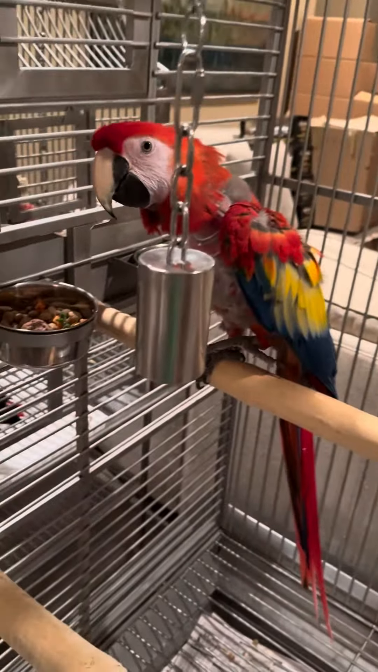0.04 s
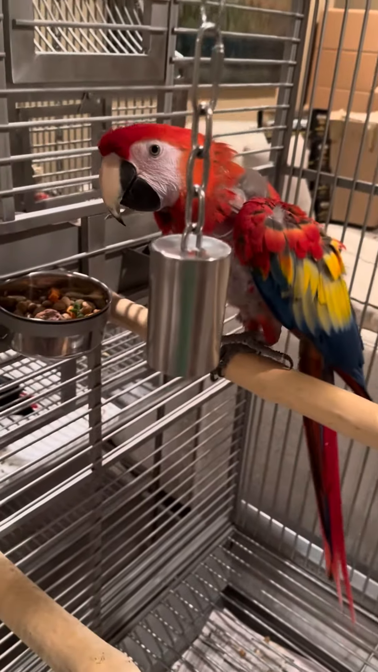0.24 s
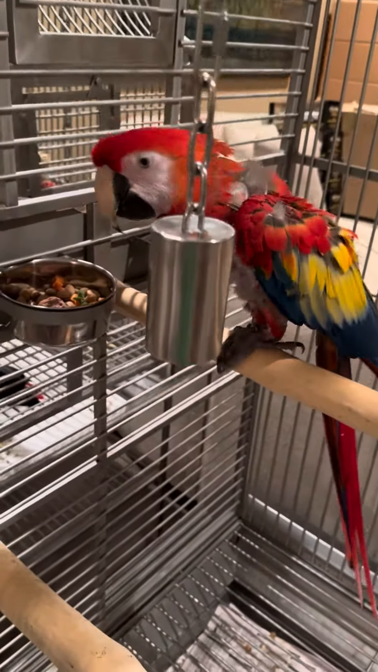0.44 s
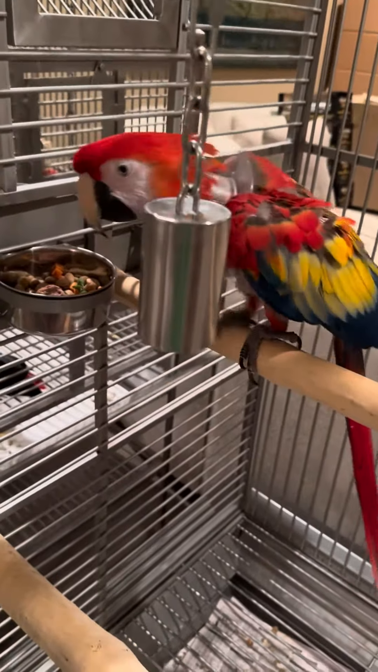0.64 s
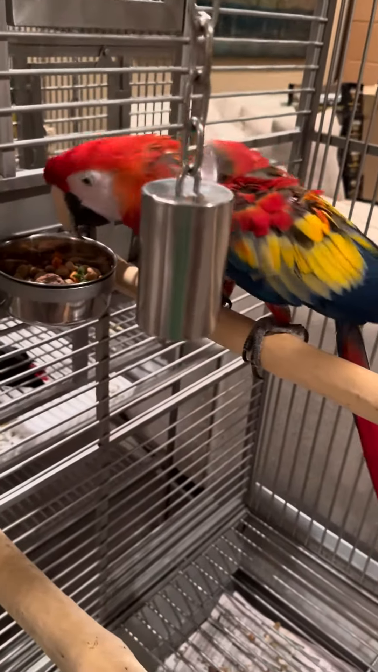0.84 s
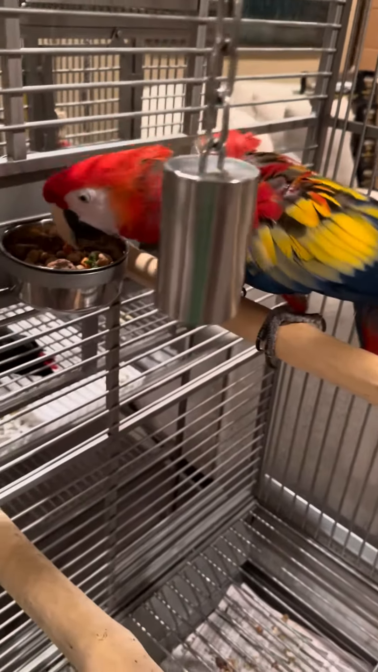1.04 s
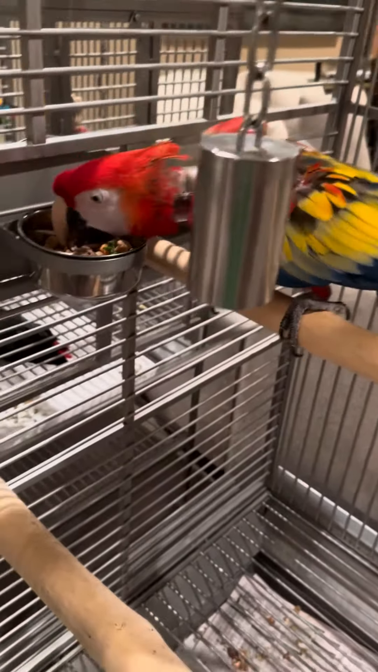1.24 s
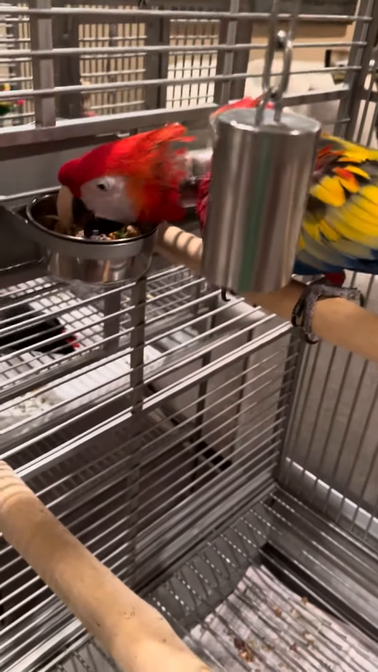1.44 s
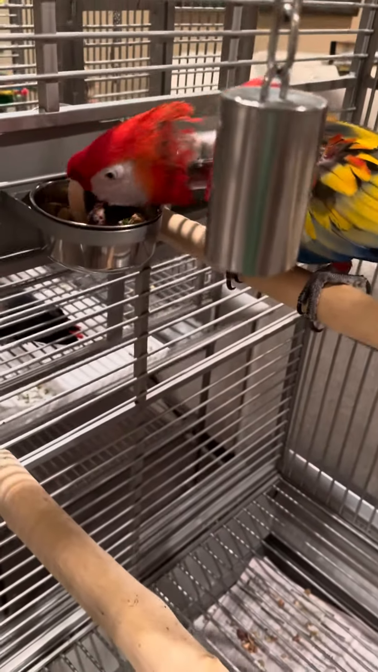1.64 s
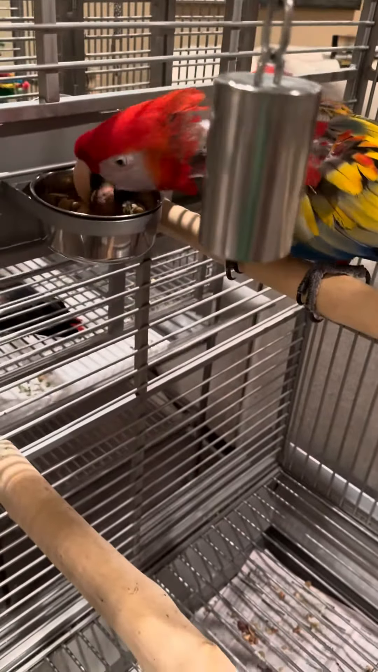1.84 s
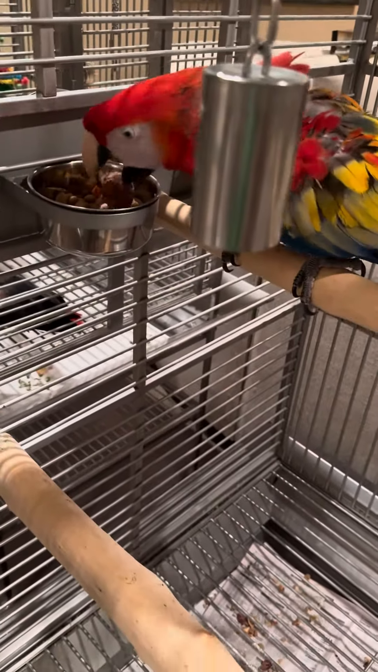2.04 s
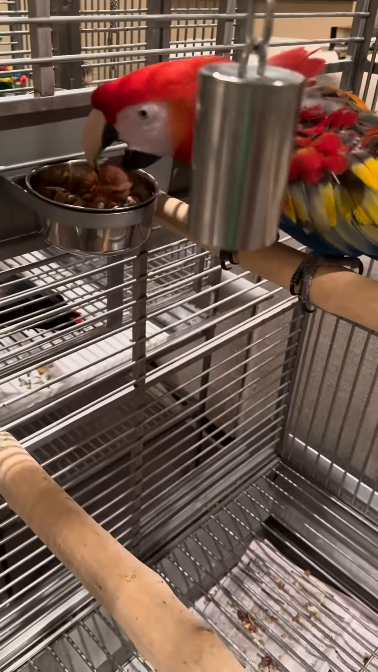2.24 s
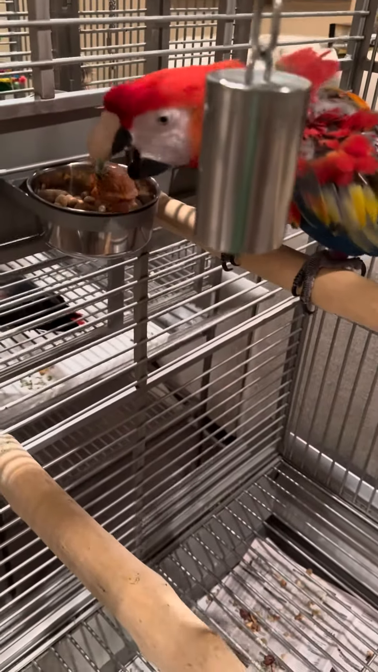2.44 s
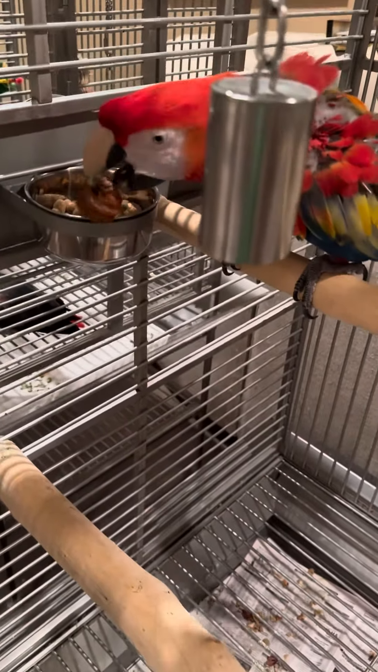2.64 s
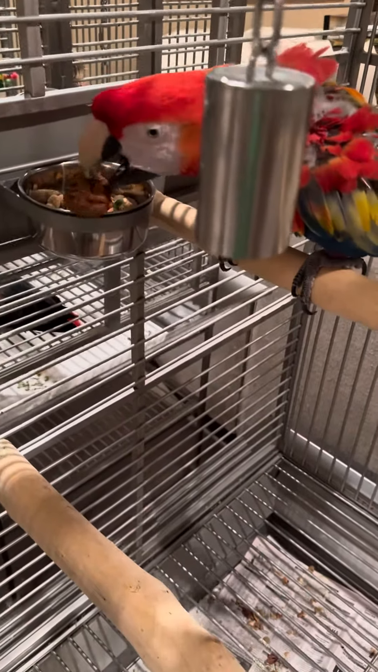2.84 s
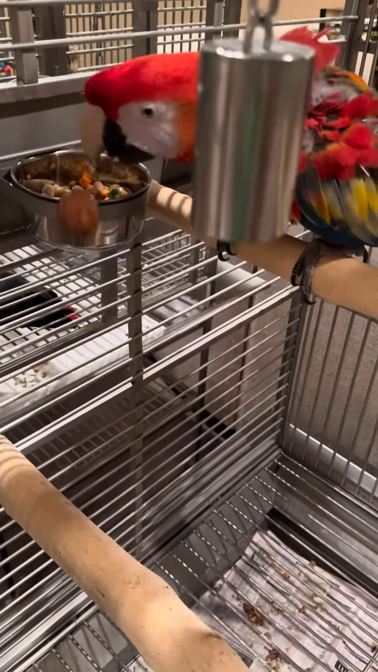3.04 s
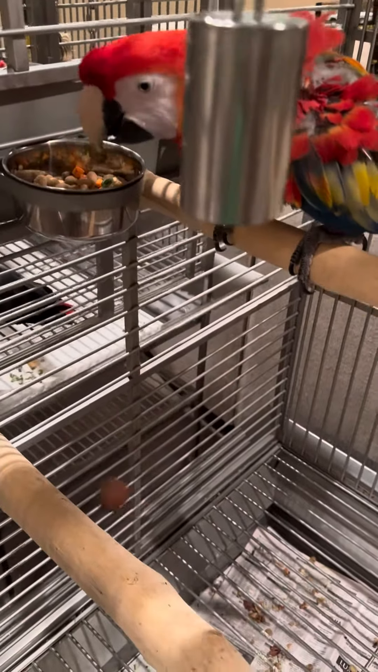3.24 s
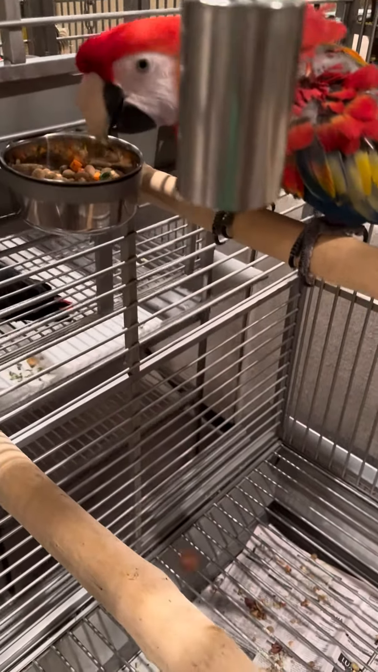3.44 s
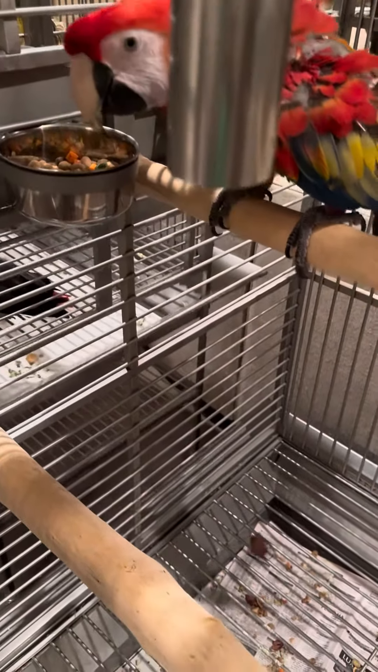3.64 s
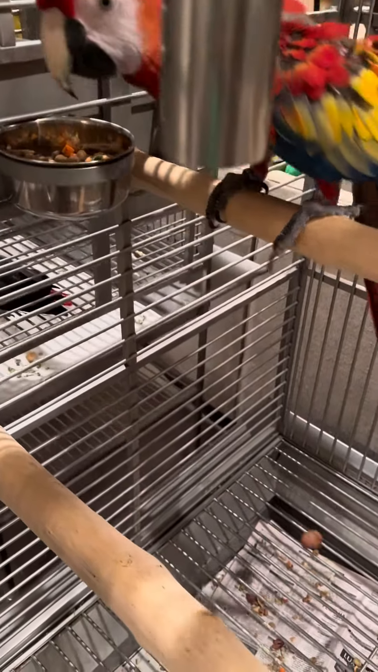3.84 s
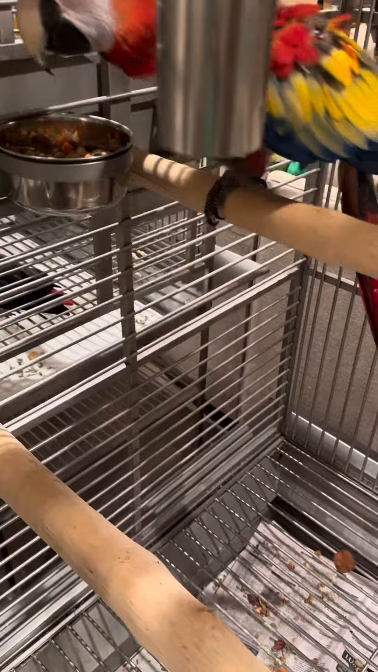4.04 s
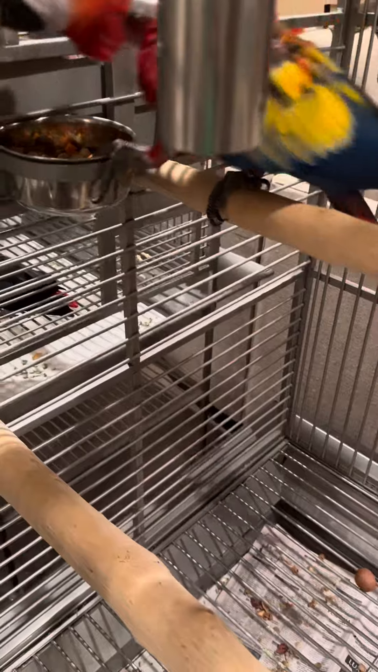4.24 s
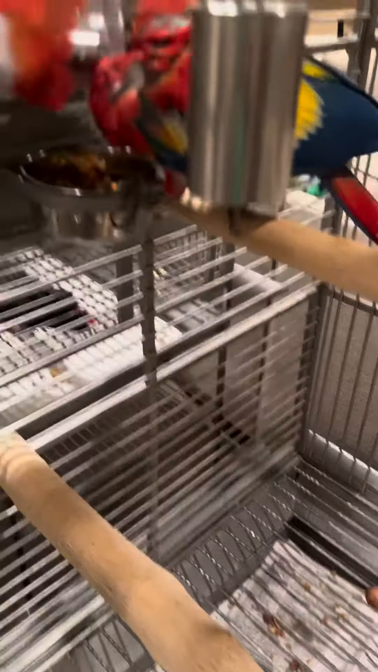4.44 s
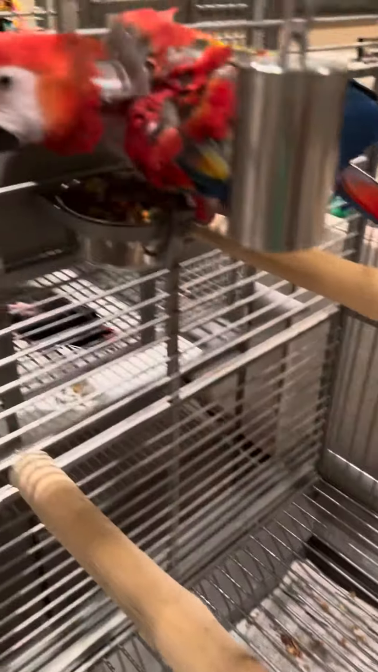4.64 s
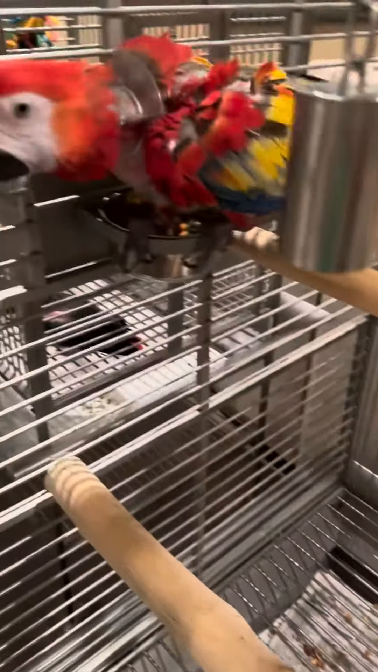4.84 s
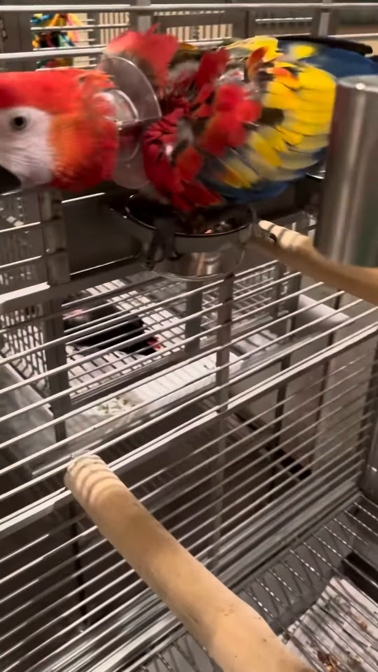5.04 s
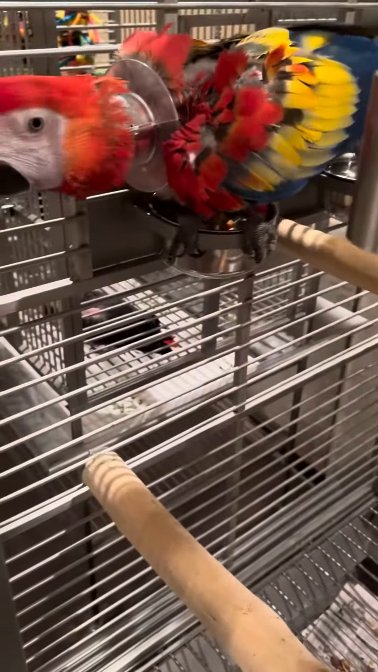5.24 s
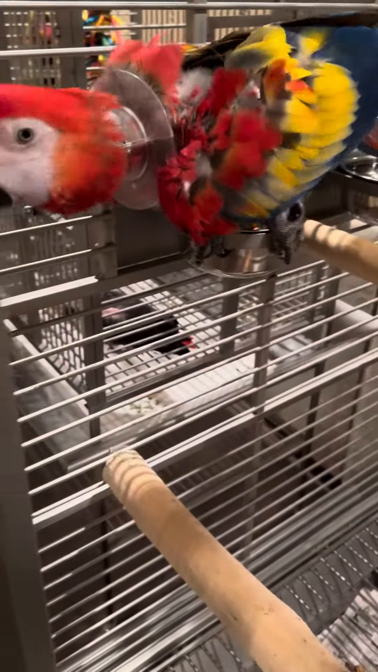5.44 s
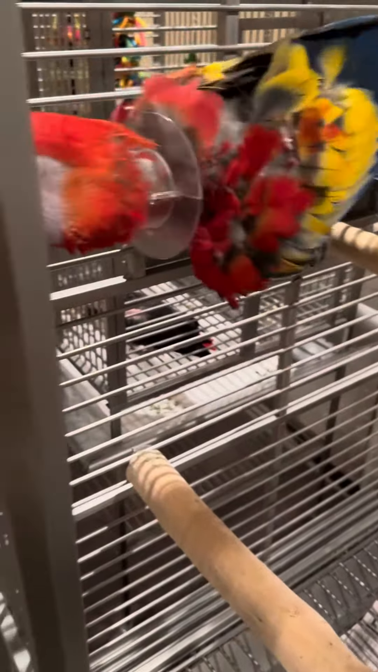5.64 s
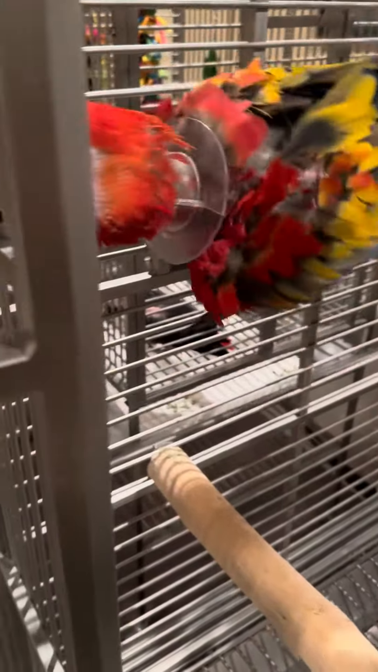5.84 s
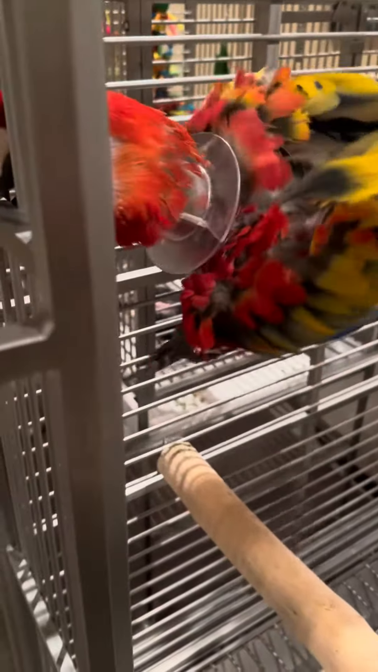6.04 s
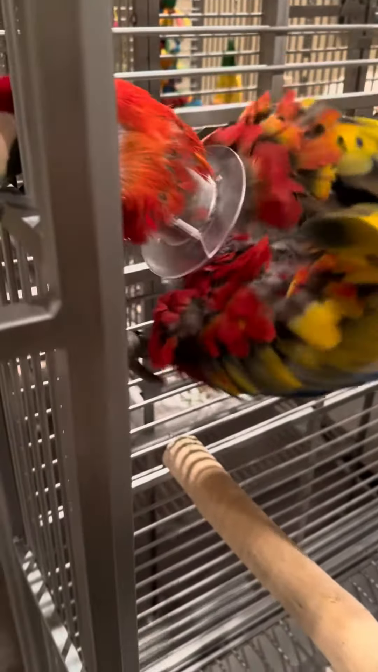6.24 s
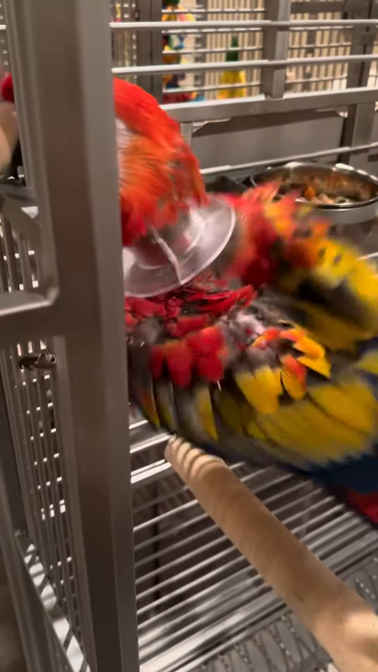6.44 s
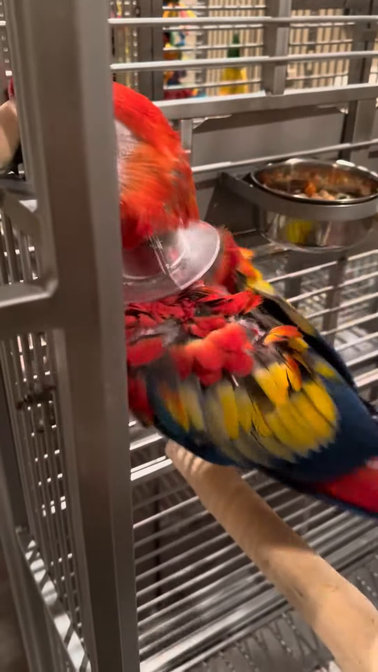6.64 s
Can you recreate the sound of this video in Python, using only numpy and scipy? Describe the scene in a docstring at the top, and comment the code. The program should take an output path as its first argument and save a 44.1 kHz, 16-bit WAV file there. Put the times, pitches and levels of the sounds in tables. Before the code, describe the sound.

A macaw shifts in a steel cage indoors, heard close in stereo. Claws click and rattle the wires, a hanging toy tings faintly, and the beak taps a food bowl. A nut then strikes the grate very loudly, bounces ringing across the metal tray, and leaves the cage humming. Beak snaps, claw rattles and a cluster of duller bowl knocks follow.

```python
"""Claws rattle steel wire panels over a low rumble, a beak snaps on bars and taps a steel bowl, a toy tings,
a nut hits the grate and bounces on the tray, the bowl knocks in its holder: a macaw in a cage indoors, heard close.
Each blow is a noise crack, a rattle that buzzes in the modes of the struck thing, and clear beating tones.
Jolts swell a room rumble, a frame drone and a wash of wires, all shaped noise over a steady floor of rumble
and wash. Two microphone ports hear the treble out of step, and scattered sound differs between them."""
import sys
import numpy as np
from scipy import signal
from scipy.fft import rfft, irfft
from scipy.io import wavfile
from scipy.ndimage import uniform_filter1d

SR = 44100
rng = np.random.default_rng(int(sys.argv[2]) if len(sys.argv) > 2 else 0)


def wav_record(signal):
    """Record a signal, one row per channel, as 16-bit PCM in the file named by sys.argv[1]."""
    frames = np.transpose(np.atleast_2d(signal))
    bounded = np.clip(frames, -1, 1)
    # unit amplitude maps onto the largest positive 16-bit level
    quanta = np.round(bounded * 32767).astype(np.int16)
    wavfile.write(sys.argv[1], SR, quanta)


N = 295470
TIME = np.arange(N) / SR  # s
HZ = np.arange(N // 2 + 1) * SR / N
AFTER = np.arange(2 ** 15) / SR  # s since a blow

# modes of the cage wires: (frequency [Hz], level [dB], t60 [s])
WIRE_MODES = [(850, -9, .6), (1350, -8, .6), (1900, -7, .5), (2250, -7, .4), (2650, -5, .35),
              (2900, -6, .3), (3800, -3, .35), (4130, -8, .3), (4500, -6, .35), (4810, -4, .25),
              (5600, -5, .3), (5930, 0, .3), (6600, -6, .25), (7400, -2, .25), (8300, -5, .25),
              (8650, -6, .25), (9400, -6, .2), (10500, -5, .2), (11200, -6, .15), (14000, -6, .15)]
# noise bands of a blow: (centre [Hz], t60 [share of the rattle's t60])
RATTLE_BANDS = [(500, 0.7), (1000, 1.16), (2000, 0.69), (3500, 0.7), (5500, 0.34), (8000, 0.69),
                (11500, 0.27), (14500, 0.26)]

SPOT_DB = 3  # spread of mode levels from one struck spot to another


def undb(db):
    """Amplitude of a level in dB."""
    return 10 ** (np.asarray(db) / 20)


def unit(x):
    """Scale to an RMS of one."""
    return x / np.sqrt(np.mean(x ** 2))


def fade(t, t60):
    """Exponential decay that falls 60 dB in t60 seconds."""
    return np.exp(-np.log(1000) * t / t60)


def on_log(points, hz):
    """Value of (Hz, value) points at hz, straight on a log frequency axis."""
    f, value = np.transpose(points)
    return np.interp(np.log(np.maximum(hz, 1)), np.log(np.maximum(f, 1)), value)


def shaped(x, gain):
    """Filter the whole length by a gain over frequency."""
    return irfft(rfft(x) * gain, N)


def noise(gain):
    """Steady noise of unit RMS with the given spectrum."""
    return unit(shaped(rng.standard_normal(N), gain))


def add(out, s, sound):
    """Mix a sound in, starting at s seconds."""
    i = int(s * SR)
    out[i:i + len(sound)] += sound[:N - i]


def resonant(hz, modes, spot_db):
    """Gain of noise that buzzes in the modes of a thing, among many lesser resonances."""
    width = int(55 / hz[1])  # 55 Hz in bins
    ripple = uniform_filter1d(rng.standard_normal(len(hz)), width)
    crowd_db = 4 * unit(uniform_filter1d(ripple, width))
    mode_hz, mode_db, _ = np.transpose(modes)
    buzz_db, buzz_width = 7, 0.009  # half-width as a share of the mode's frequency
    peaks = 1 / (1 + ((hz / mode_hz[:, None] - 1) / buzz_width) ** 2)
    return undb(crowd_db) + undb(mode_db + spot_db + buzz_db) @ peaks


def aftershake(s, db, rise_s, t60):
    """Amplitude that swells after each jolt and dies slowly; jolts add in power."""
    since = np.maximum(TIME - s[:, None], 0)
    swells = undb(db)[:, None] * (1 - np.exp(-since / rise_s)) * fade(since, t60)
    return np.sqrt(np.sum(swells ** 2, axis=0))


def shake():
    """Room rumble, the drone of the frame and the wash of faintly buzzing wires, stirred by jolts."""
    # jolts of the whole cage: (time [s], rumble [dB], frame drone [dB], wire wash [dB])
    jolts = [(.2, -54, -56, -58.5), (.9, -64, -64.5, -61.5), (1.53, -50, -60, -54),
             (2.549, -61, -85, -66.5), (3.22, -46, -54, -46), (3.46, -37, -38.5, -38), (4.3, -48, -44, -69),
             (5.05, -56, -47.5, -56.5), (5.401, -50.5, -51, -54), (6.101, -58.5, -66, -56.5),
             (6.38, -53, -57, -54.5)]
    # rumble spectrum: (frequency [Hz], relative level [dB])
    rumble_colour = [(18, -57.5), (30, -5.5), (160, -1.5), (200, -5), (264, -4), (293, -5.5), (353, 1.5),
                     (531, -12.5), (700, -12), (910, -9.5), (1540, -120)]
    # wire wash spectrum before the wires' resonances: (frequency [Hz], relative level [dB])
    wash_colour = [(400, -29.5), (800, -7), (1300, 10), (3200, 1.5), (7000, -1.5), (10000, -7.5),
                   (15000, -0.5)]
    # frame resonances: (frequency [Hz], width [Hz], relative level [dB])
    frame_modes = [(150.1, 4.9, 0), (168.5, 7.4, -2), (361, 2.7, -17)]
    s, rumble_db, drone_db, wash_db = np.transpose(jolts)

    rumble_level = np.hypot(undb(-67.5), aftershake(s, rumble_db, rise_s=0.023, t60=3.96))  # over a floor
    # the rumble dips briefly
    deepest_s, lead_s, recovery_s, depth_db = 3.19, 0.38, 0.04, -14.5
    dip_times = [deepest_s - lead_s, deepest_s, deepest_s + recovery_s]
    dip = undb(np.interp(TIME, dip_times, [0, depth_db, 0]))
    rumble = rumble_level * dip * noise(undb(on_log(rumble_colour, HZ)))

    frame = sum(undb(db) / (1 + (2 * (HZ - hz) / width) ** 2) for hz, width, db in frame_modes)
    drone = aftershake(s, drone_db, rise_s=0.28, t60=3.77) * noise(frame)

    wash_level = np.hypot(undb(-68.5), aftershake(s, wash_db, rise_s=0.023, t60=3.94))  # over a floor
    wires = resonant(HZ, WIRE_MODES, 0) ** 0.96
    return rumble + drone + wash_level * noise(undb(on_log(wash_colour, HZ)) * wires)


def clusters(modes, count=4):
    """Each mode is a few close tones, not quite in tune, that beat while they fade."""
    hz, _, t60 = np.transpose(modes)[:, :, None]
    detune_hz = .004 * hz + 16
    draws = rng.uniform(-0.957, 1, (count, 2, len(modes), 1))  # detuning share, starting turn
    tones = sum(np.sin(2 * np.pi * ((hz + detune_hz * off) * AFTER + turn)) for off, turn in draws)
    return tones / np.sqrt(count) * fade(AFTER, t60)


def bands(hz, gain):
    """Random-phase noise split into the rattle's bands, each scaled to an even level."""
    spectrum = gain * np.exp(2j * np.pi * rng.random(len(hz)))
    centres = np.transpose(RATTLE_BANDS)[0][:, None]
    octaves = np.log2(np.maximum(hz, 1) / centres)
    parts = irfft(spectrum * np.exp(-(octaves / .5) ** 2), 2 * len(hz) - 2)
    return parts / parts.std(axis=1, keepdims=True)


def chatter():
    """Uneven gain over the length of one rattle: a random level 400 times a second."""
    steps = np.arange(0, AFTER[-1] + .1, 1 / 400)
    return undb(3 * np.interp(AFTER, steps, rng.standard_normal(len(steps))))


def lift(hz, loudest):
    """Gain peaks around the modes that the struck spot favours."""
    width = .026  # half-width as a share of the frequency
    return 1 + undb(8) * sum(1 / (1 + ((hz - bar) / (width * bar)) ** 2) for bar in loudest)


def blows(table, modes, low_db, mid_db, top_db, rattle_t60, rise_ms, crack_t60, crack_rise_ms, tick_db):
    """Crack, dense rattle and clear modes; row 0 direct, row 1 as near surfaces scatter it.

    Colours low (600 Hz), mid (3.8 kHz) and top (10 kHz) are re 1.9 kHz for a blow of treble 0; the tick is re crack."""
    out = np.zeros((2, N))
    mode_hz, mode_db, _ = np.transpose(modes)
    band_hz, share = np.transpose(RATTLE_BANDS)
    hz = np.arange(len(AFTER) // 2 + 1) * SR / len(AFTER)

    crack = fade(AFTER, crack_t60) + undb(tick_db) * fade(AFTER, 0.0048)
    crack = crack * (1 - np.exp(-AFTER * 1000 / crack_rise_ms))
    crack = crack / (1 + (625 / band_hz[:, None]) ** 2)  # a crack carries little below 625 Hz
    rise = 1 - np.exp(-AFTER * 1000 / rise_ms)
    tail = rise * fade(AFTER, rattle_t60 * share[:, None])

    for row in out:
        tones = clusters(modes)
        spots = rng.standard_normal((len(table), len(modes)))
        for (s, db, treble, rattle_db, ring_db, *loudest), spot in zip(table, spots):
            # a harder, smaller contact tilts the whole colour
            low = low_db - 0.25 * treble
            top = top_db + 1.225 * treble
            colour = [(600, low), (1900, 0.0032), (3800, mid_db + treble / 2), (5800, treble),
                      (10000, top), (16000, top - 4)]
            spot_db = SPOT_DB * spot  # every struck spot favours other modes
            buzz = bands(hz, lift(hz, loudest) * resonant(hz, modes, spot_db))
            envelope = crack + undb(rattle_db) * chatter() * tail
            rattle = undb(on_log(colour, band_hz)) @ (envelope * buzz)
            tone_level = undb(ring_db + mode_db + on_log(colour, mode_hz) + spot_db)
            ring = (tone_level * np.sqrt(lift(mode_hz, loudest))) @ tones
            add(row, s, undb(db) * (rattle + rise * ring))
    return out


# Each table of blows below lists (time [s], crack level [dB], treble at 5.8 kHz re 1.9 kHz [dB],
# rattle re crack [dB], modes re crack [dB], loudest ring [Hz], next loudest ring [Hz]).


def claws():
    """Claws jar the wire panels: a very short crack, then a rattle in the wires' modes."""
    # claw blows on wire: columns of a table of blows, as above
    claw_blows = [(0.1921, -43, -8, -11, -28, 1230, 885), (0.24, -34.5, -3.5, -9, -7, 6120, 2210),
                  (0.3198, -49.5, -13, -3.5, -28, 965, 3500), (0.3994, -61, 12, -7, -19, 5700, 955),
                  (0.4296, -59, 11.5, -9, -6, 8800, 6200), (0.5867, -35.5, 1, -21.5, -48, 2670, 2240),
                  (0.6544, -52, 6.5, -11, -7, 7420, 5800), (0.8194, -69, 10, -8, -5, 8650, 7240),
                  (0.8466, -61, 17.5, -14, -5.5, 5800, 4770), (0.8972, -45, 5, -8, -10, 7360, 11300),
                  (0.9851, -49, 6.5, -13, -9.5, 5920, 4800), (1.112, -59.5, 15.5, -4, -5, 8300, 13100),
                  (1.3854, -56.5, -31, -10.5, -57, 1150, 6940), (1.4057, -62.5, 9.5, 0.5, -21, 4950, 8040),
                  (1.5277, -37.5, -6.5, -4.5, -16.5, 1350, 3850),
                  (1.6938, -38, -7.5, -10, -13.5, 1350, 2700), (1.9853, -58, 16, -1, -18, 8300, 3900),
                  (2.0199, -48, 11.5, -11.5, -10.5, 7700, 3940), (2.2875, -65.5, 14.5, -11, -45, 7700, 750),
                  (2.7984, -57, 8.5, -1.5, 1.5, 910, 3600), (3.1444, -51.5, -1.5, -3.5, -5.5, 2800, 2340),
                  (4.6583, -36.5, -16, -13.5, -8.5, 1570, 2275), (5.0517, -33, 1, -9.5, -9, 6250, 4750),
                  (5.2194, -50.5, 4.5, -11.5, -7, 5350, 7840), (6.0975, -42.5, -7, -10, -13, 1550, 3380),
                  (6.1489, -41.5, -47, -16, -3.5, 1150, 710), (6.1844, -52.5, 3, -17, -21, 700, 2030),
                  (6.2636, -58.5, 18, -6.5, -21, 9420, 6900), (6.3827, -37.5, 3.5, -10.5, -22, 7940, 7640),
                  (6.4862, -49, 12, -8.5, -7, 9200, 2600), (6.6832, -47.5, -6, -5.5, -28, 2360, 1070)]
    return blows(claw_blows, WIRE_MODES, low_db=-11.5, mid_db=-1.5, top_db=1, rattle_t60=0.7157,
                 rise_ms=4.5, crack_t60=0.004, crack_rise_ms=0.5, tick_db=-3.5)


def snaps():
    """The beak snaps on the bars: a strong first tick and a bright crack over the wires' modes."""
    # beak snaps on wire: columns of a table of blows, as above
    beak_snaps = [(0.9005, -51.5, 3.5, -28, -28, 11300, 13700), (4.193, -46.5, 14, -20, -18, 7340, 10700),
                  (4.2424, -42, 6.5, -14, -24, 10300, 7700), (4.3301, -29.5, -19, -16.5, -35, 1710, 1040),
                  (4.4244, -54.5, -5, -32, -30, 6860, 5700), (4.509, -27.5, -3, -19.5, -22, 13000, 2680),
                  (4.5835, -36, -8, -14, -30, 8200, 2780), (4.7214, -49.5, 12, -16.5, -37, 7170, 7960),
                  (4.7466, -41.5, -2.5, -14, -13, 6400, 7740), (4.9816, -41, -6.5, -12, -34, 842, 1460),
                  (5.1354, -46.5, 0, -9, -30, 6100, 7600), (5.1786, -39, -9.5, -17, -35, 1500, 7220),
                  (5.6874, -54, 2, -8, -24, 7710, 4420), (6.3244, -30, -1, -12, -24, 7980, 9800)]
    return blows(beak_snaps, WIRE_MODES, low_db=-16.5, mid_db=-9, top_db=16.5, rattle_t60=0.5,
                 rise_ms=3, crack_t60=0.0327, crack_rise_ms=0.65, tick_db=5.5)


def toy():
    """A hanging steel toy tings: a close pair of modes beats as it fades."""
    # modes of the toy: (frequency [Hz], level [dB], t60 [s])
    toy_modes = [(7350, -38.5, 0.77), (7100, -37.5, 0.67)]
    out = np.zeros(N)
    ting = sum(undb(db) * np.sin(2 * np.pi * hz * AFTER) * fade(AFTER, t60) for hz, db, t60 in toy_modes)
    add(out, 2.015, ting)
    return out


def taps():
    """The beak taps the steel food bowl, whose short modes ring out at once."""
    # beak taps on the bowl: columns of a table of blows, as above
    bowl_taps = [(2.5129, -30.5, -27.5, -21.5, -3.5, 897, 1510), (2.6354, -47, -28.5, -15, -4.5, 880, 1556),
                 (2.6489, -33, -43, -22.5, -50, 1030, 2150), (2.6559, -41.5, -24, -25.5, -1, 2490, 1610),
                 (2.6864, -55, -39, -13.5, 4.5, 1470, 2460), (2.8122, -32, -33, -19, -9.5, 970, 2120),
                 (2.9099, -37, -38, -22.5, -5.5, 986, 2030), (2.9935, -44, -27, -10.5, -4.5, 944, 2050)]
    # modes of the bowl: (frequency [Hz], level [dB], t60 [s])
    bowl_modes = [(640, -12, .12), (935, 3, .15), (1233, -4, .18), (1480, -4, .12), (1572, 1, .18),
                  (1793, 1, .11), (2000, -3, .1), (2175, -1, .13), (2466, -6, .32), (2708, -9, .18),
                  (3402, -20, .2)]
    return blows(bowl_taps, bowl_modes, low_db=-16.5, mid_db=-5, top_db=29.5, rattle_t60=1,
                 rise_ms=0.1, crack_t60=0.0841, crack_rise_ms=4.5, tick_db=-4)


def nut_on_grate():
    """A dropped nut strikes the grate and rings its modes."""
    # nut on the grate: columns of a table of blows, as above
    grate_blows = [(3.2222, -6, -27.5, -25, -17, 1860, 1546)]
    # modes of the grate: (frequency [Hz], level [dB], t60 [s])
    grate_modes = [(310, -4, .5), (680, -1, .5), (1071, -4, .4), (1459, -5, .18), (1534, -5, .25),
                   (1900, 1, .14), (2331, -7, .25), (2600, -10, .4), (2826, -6, .15), (3020, -2, .1),
                   (3564, -4, .15), (5841, -14, .12)]
    return blows(grate_blows, grate_modes, low_db=-18, mid_db=3, top_db=12.5, rattle_t60=0.73,
                 rise_ms=4.5, crack_t60=0.03, crack_rise_ms=1.95, tick_db=1.5)


def nut_on_tray():
    """The nut bounces on the sheet tray, which rings longer."""
    # nut on the tray: columns of a table of blows, as above
    tray_blows = [(3.463, -10, -1.5, -20, -18.5, 1885, 4160), (3.4764, -17, -1.5, -11.5, -15, 2030, 3780),
                  (3.4895, -15.5, -5.5, -14, -19, 2060, 5840), (3.627, -27.5, -7, -20.5, -25, 3930, 6200),
                  (3.5922, -26.5, -3, -8.5, -28.5, 3780, 1310),
                  (3.6157, -23.5, -2.5, -9.5, -16.5, 3900, 2060), (3.7394, -19, -2.5, -13, -15, 1346, 4910),
                  (3.8494, -30, -10.5, -9.5, -9.5, 2940, 5200),
                  (3.9838, -35.5, -14.5, -1, -15.5, 2930, 2125)]
    # modes of the tray: (frequency [Hz], level [dB], t60 [s])
    tray_modes = [(940, -16, 1.1), (1362, -7, 1.1), (1712, -16, .45), (2051, -2, .25), (2126, -8, .9),
                  (2466, -12, .3), (3010, -8, 1.1), (3558, -11, .3), (3784, -3, .25), (3900, -6, .8),
                  (4134, -14, .5), (4807, -16, .45), (5082, -9, 1.0), (5599, -6, .25), (5814, -9, .3),
                  (6358, -14, .4), (7284, -22, .4)]
    return blows(tray_blows, tray_modes, low_db=-15.5, mid_db=-0.6, top_db=-9, rattle_t60=1.08,
                 rise_ms=0.2, crack_t60=0.004, crack_rise_ms=1.2, tick_db=-5)


def knocks():
    """The bowl knocks in its holder: a fuller, duller blow that rings the wires."""
    # bowl knocks: columns of a table of blows, as above
    bowl_knocks = [(5.4004, -33, -4.5, -14.5, -12, 5900, 805),
                   (5.4375, -31.5, -4.5, -20.5, -21, 1430, 4600),
                   (5.5072, -40.5, 4.5, -20, -27, 1120, 5950), (5.5118, -32.5, 0, -21, -28, 2400, 1500),
                   (5.5176, -34.5, 6, -16, -31, 3130, 5580), (5.52, -28.5, -0.5, -18.5, -18, 6030, 2180)]
    return blows(bowl_knocks, WIRE_MODES, low_db=0.5, mid_db=0.5, top_db=-14.5, rattle_t60=0.56,
                 rise_ms=10, crack_t60=0.004, crack_rise_ms=0.5, tick_db=2)


def ports(direct, scattered):
    """Both ports hear the direct sound out of step by a phase; the scattered sound differs left and right."""
    # phase between the ports: (frequency [Hz], lead of the left port [rad])
    port_lead = [(0, 0), (5500, 0), (7060, -1.3), (9000, -2.4), (11500, -2.75), (14000, -3.6),
                 (15600, -4.0)]
    # scattered sound re direct sound: (frequency [Hz], level [dB])
    spread = [(60, -23.5), (150, -25.5), (300, -14.5), (600, -7.5), (1200, -8.5), (1900, -19), (2800, -0.5),
              (4200, -5), (6000, -6), (9000, -21.5), (14000, -22)]
    half_lead = np.exp(.5j * np.interp(HZ, *np.transpose(port_lead)))
    side = shaped(scattered, undb(on_log(spread, HZ)))
    left = shaped(direct + side, half_lead)
    right = shaped(direct - side, 1 / half_lead)
    return np.array([left, right])


def scene():
    """All blows, the toy and the shaking cage, heard at the two ports."""
    hits = claws() + snaps() + taps() + nut_on_grate() + nut_on_tray() + knocks()
    # the blows carry no deep bass below 250 Hz
    hits = signal.sosfilt(signal.butter(4, 250, "high", fs=SR, output="sos"), hits)
    return ports(hits[0] + toy() + shake(), hits[1] + shake())


def record(dry):
    """Soft limit on the loudest peaks, then a deep-bass cut and a top cut."""
    limited = .85 * np.tanh(dry / .85)
    thin = signal.sosfilt(signal.butter(3, 60, "high", fs=SR, output="sos"), limited)
    return signal.sosfilt(signal.ellip(8, .2, 70, 16100, fs=SR, output="sos"), thin)


dry = scene()
out = record(dry)
wav_record(out)
```